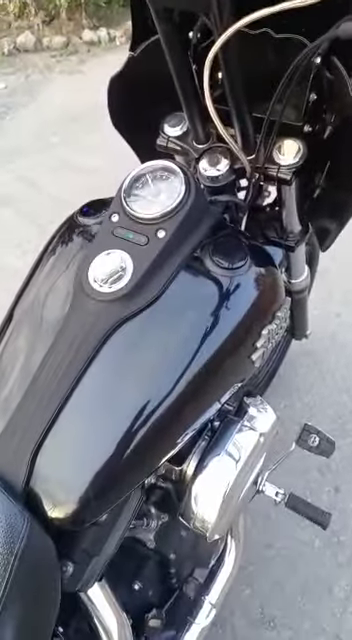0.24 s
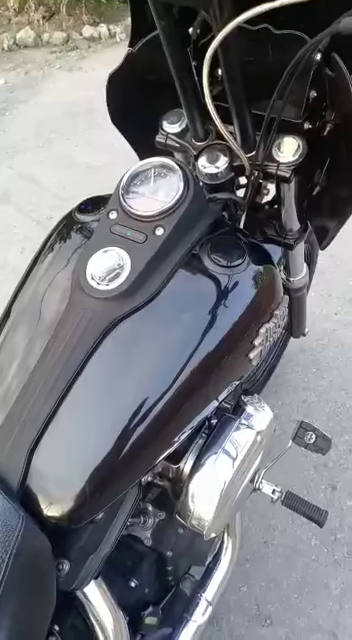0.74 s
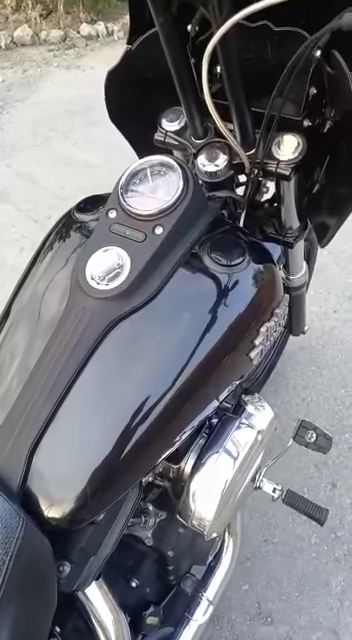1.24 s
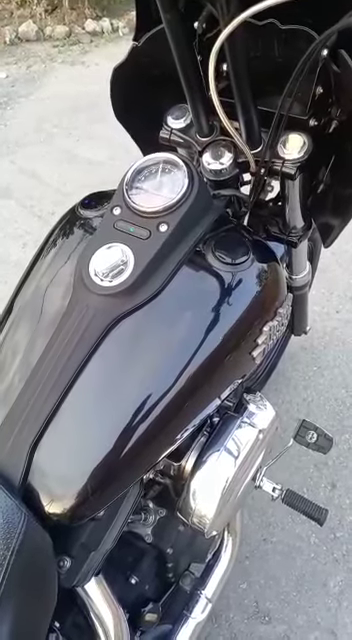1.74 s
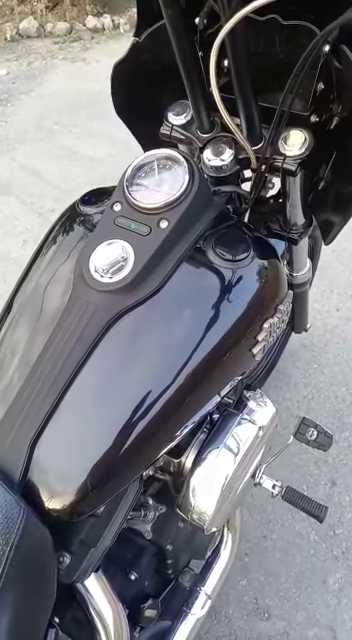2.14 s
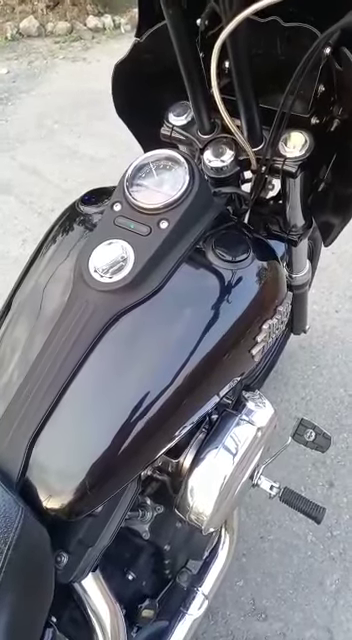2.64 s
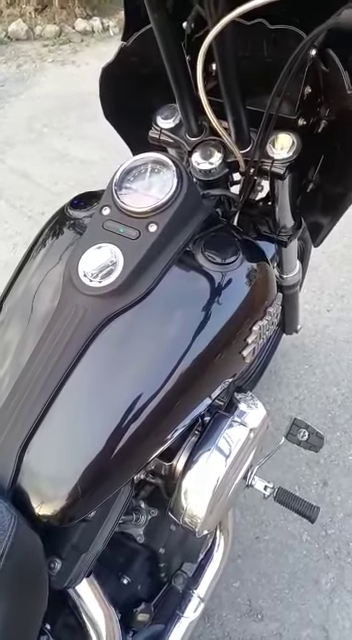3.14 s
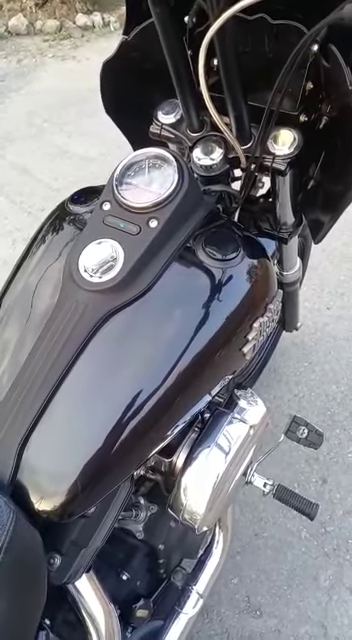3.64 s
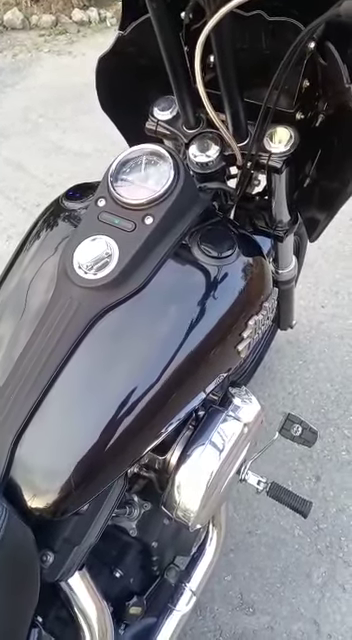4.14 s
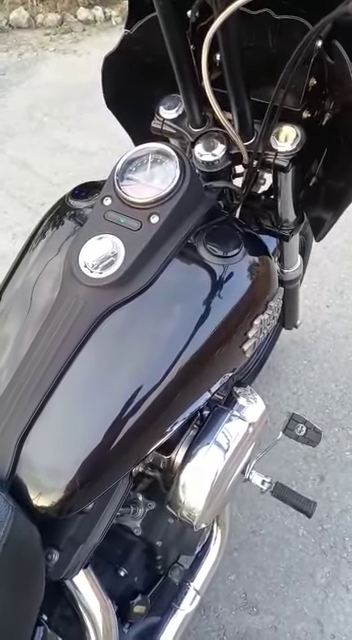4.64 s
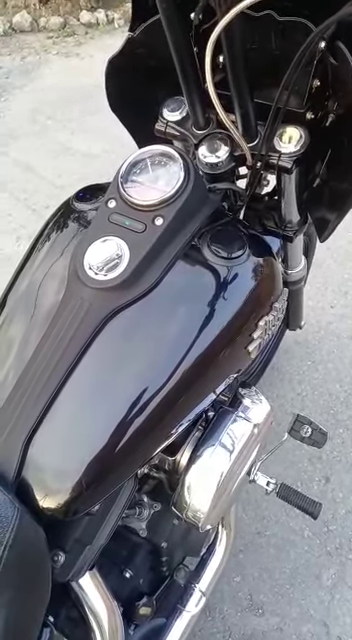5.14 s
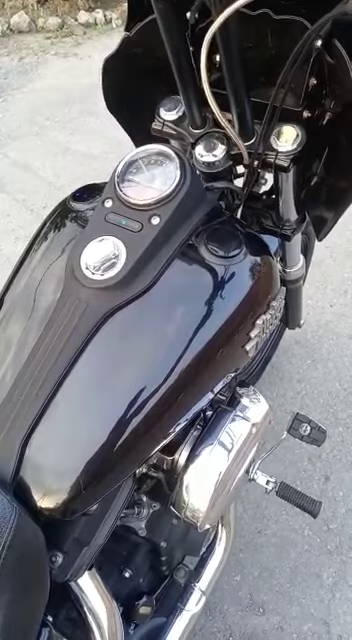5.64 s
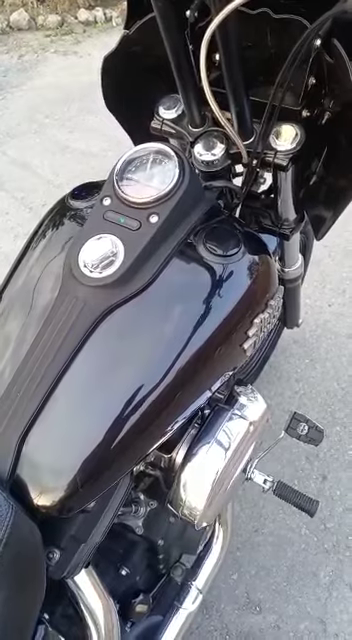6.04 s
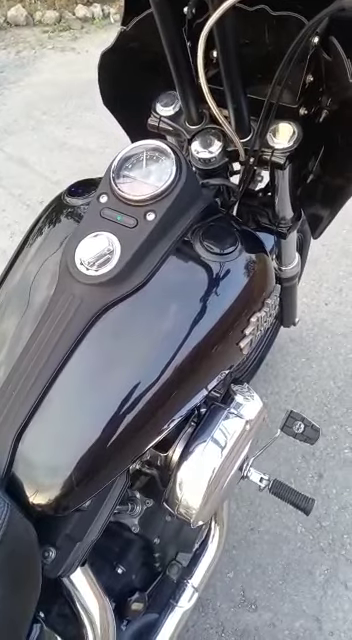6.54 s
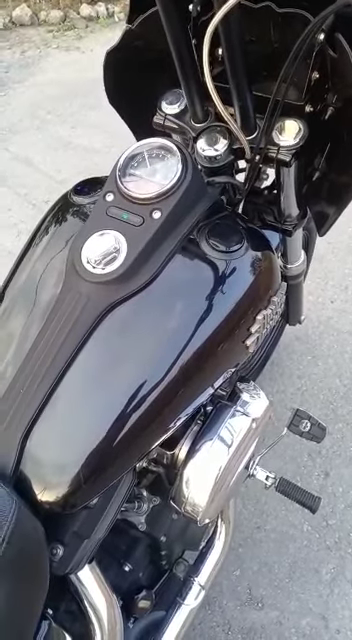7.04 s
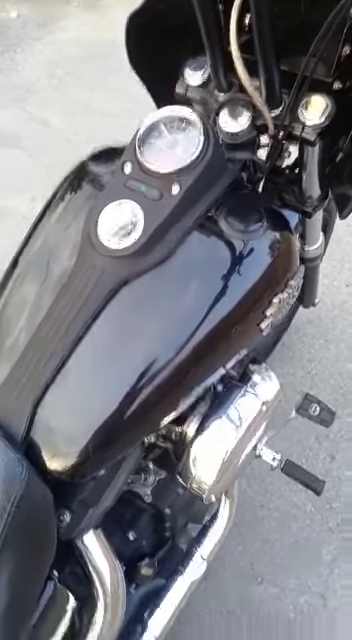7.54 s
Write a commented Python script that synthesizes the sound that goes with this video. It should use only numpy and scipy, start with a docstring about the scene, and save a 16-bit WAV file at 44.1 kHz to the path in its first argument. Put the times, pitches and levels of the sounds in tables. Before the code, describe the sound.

A V-twin motorcycle stands on a road with its engine running, heard close from above the tank. The throttle is blipped five times at uneven intervals. Each blip gives a quick intake bark with hiss and metallic knocking, then the revs fall away gradually. Deep, uneven exhaust thumps and mechanical clatter run throughout, and after the last blip the engine slows to idle.

```python
"""V-twin motorcycle, five throttle blips

Standing on a road, heard from above the tank; after the last blip the engine runs down to idle.
Two unevenly spaced cylinders thump through the exhaust. Valve gear, chain and cases clatter with
crank speed. With the throttle open the air box barks, the intake hisses and the pistons knock harder."""
import sys
import numpy as np
from scipy import signal
from scipy.fft import rfft, irfft, next_fast_len
from scipy.io import wavfile
from scipy.ndimage import uniform_filter1d, map_coordinates

SR = 44100
rng = np.random.default_rng(int(sys.argv[2]) if len(sys.argv) > 2 else 0)


def wrap_up_sound(samples):
    """Save the sound to the file named by the first command line argument, as 16-bit audio."""
    columns = np.atleast_2d(samples).T
    # keep every value between -1 and 1, then stretch to whole-number steps
    tamed = np.clip(columns, -1, 1)
    steps = np.round(tamed * 32767).astype(np.int16)
    wavfile.write(sys.argv[1], SR, steps)


N = 343098

# Grip twists: (pick-up [s], opens [s], fully open [s], eases [s], shut [s], top speed [rpm],
# run-down time constant [s], level offset [dB])
BLIPS = [(0.022, 0.026, 0.113, 0.21, 0.272, 3035, 1.426, 1.6),
         (0.936, 1.009, 1.103, 1.205, 1.295, 3686, 1.348, 0),
         (2.6, 2.666, 2.838, 2.96, 2.99, 3490, 1.318, 0.7),
         (3.722, 3.798, 3.882, 4.02, 4.06, 3704, 1.336, -0.5),
         (5.509, 5.553, 5.735, 5.83, 5.868, 3520, 1.356, 0)]
# Throttle shut; pipe booms near 3200 rpm: (speed [rpm], thump [dB], gas rush [dB], clatter [dB])
COAST_LEVELS = [(1120, -22, -40, -46.5), (1410, -24, -39.5, -45.5), (2060, -20, -36, -40.5),
                (2730, -16.5, -30.5, -36), (3223, -10.5, -32.5, -32.5), (3680, -11.5, -28.5, -31)]
# Last gulps of air at the closing throttle plate: (time [s], relative level [dB])
GULPS = [(0.259, -27), (1.275, -17), (2.973, -20), (4.043, -22), (5.856, -23.5)]
# Thin whistle: (time [s], level [dB])
WHISTLE_LEVELS = [(0, -55), (4.2, -62), (4.8, -53), (5.5, -72), (6.6, -52), (7.05, -54), (7.4, -90)]
# Resonances and gas flow: (frequency [Hz], gain [dB])
EXHAUST_PIPE = [(25, -31.5), (38, -25.5), (52, -14.5), (66, -5), (83, 2.5), (100, -4), (125, -9),
                (155, -11.5), (190, -22), (235, -22.5), (285, -20), (350, -36), (600, -42.5), (1500, -87)]
SILENCER_CHURN = [(35, -36), (55, -11.5), (72, -1), (85, 0.5), (100, 2.5), (135, -8), (190, -20.5),
                  (400, -66)]
GAS_RUSH = [(100, -22), (200, 2), (310, 6), (420, 2.5), (520, -5), (640, -3.5), (780, -6), (980, -6),
            (1200, -19.5), (2000, -41.5)]
CHAIN_COVER = [(400, -25), (560, -2), (620, 7), (700, 4), (820, 4.5), (1000, -10), (1600, -13)]
AIR_BOX = [(50, -47), (130, -11), (200, -5), (240, 2.5), (268, 6), (300, -1.5), (350, -17), (450, -46),
           (650, -31.5), (1100, -23.5), (2500, -82)]
THROTTLE_CHOKE = [(250, -40), (450, 11.5), (610, 19.5), (720, -15), (1000, -16), (1800, -33)]
# Body and flow spectra, with the recorder's notch near 7.5 kHz: (frequency [Hz], gain [dB])
ENGINE_CASES = [(500, -3), (1000, -4), (1300, -2.5), (1540, 0), (1850, -6.5), (2300, -0.5), (2800, 0.5),
                (3200, -8), (3650, -4.5), (4400, -9), (5500, -7), (6400, -6), (6900, -17), (7600, -39)]
AIR_HISS = [(5000, -22), (7500, -34), (8500, -7.5), (9800, 0.5), (12000, 3), (15700, 1)]
PISTON_KNOCK = [(300, -19), (950, -3), (1700, -3.5), (2450, 5), (3200, -8), (6300, -11.5), (7500, -33),
                (10000, -25), (15000, -22)]
# Fin and cover modes: (frequency [Hz], width [Hz], gain [dB])
FIN_MODES = [(1520, 130, 2), (2250, 110, 0), (2645, 50, -2), (3560, 70, -4), (4870, 50, -8), (5380, 60, -8),
             (6155, 65, -2)]
# Noise at the two microphones: (frequency [Hz], left-right correlation [0-1])
COHERENCE = [(290, 1), (640, 0.65), (1400, 0.14), (6000, 0.15)]
# Shading by the tank: (frequency [Hz], left minus right [dB])
TANK_SHADE = [(200, -.4), (500, -2), (770, -3), (1170, 4.5), (1790, 2), (2740, -4.5), (4190, 9.5),
              (6410, 9), (9810, 1.5), (12500, -4)]

START_RPM, IDLE_RPM = 1800, 1060
OVERRUN_S, HOLD_S = .0606, .1024  # from throttle shut to end of speed rise, to start of run-down
OPEN_THUMP_DB, OPEN_RUSH_BOOST_DB, OPEN_CLATTER_BOOST_DB = -14.5, 8, 1.5
ROAR_BOOST_DB, ROAR_FROM_RPM, ROAR_FULL_RPM = 3, 2750, 3240
CHAIN_DRIVE_DB, SLACK_DRIVE_DB, SLACK_BELOW_RPM = -51.5, -47.5, 1500
KNOCK_OVER_CLATTER_DB, PING_DB, PING_END_RPM, PING_FADE_RPM = 3.5, -22, 3310, 1000
LEFT_LAG_S, BAND_LIMIT_HZ = .00028, 15830


def amp(db):
    """Decibels to gain."""
    return 10 ** (np.asarray(db) / 20)


def unit_rms(x):
    """Scale the channel mean to rms 1."""
    return x / np.sqrt(np.mean(np.atleast_2d(x).mean(0) ** 2) + 1e-20)


def steady_rms(x, window=5000):
    """Scale to a running rms of 1; window in samples."""
    power = uniform_filter1d(uniform_filter1d(x ** 2, size=window), size=window)
    return x / np.sqrt(np.abs(power) + 1e-14)


def log_interp(points, hz):
    """Interpolate (frequency [Hz], value) on a log axis."""
    knots_hz, values = np.transpose(points)
    return np.interp(np.log(hz + 1), np.log(knots_hz + 1), values)


def filtered(x, response):
    """Apply a complex frequency response."""
    size = next_fast_len(N + SR // 2)
    return irfft(rfft(x, size) * response(np.fft.rfftfreq(size, 1 / SR)), size)[..., :N]


def ring(x, spectrum, size=16384):
    """Drive a minimum-phase filter with this spectrum."""
    cepstrum = irfft(np.log(amp(log_interp(spectrum, np.fft.rfftfreq(size, 1 / SR)))))
    cepstrum[1:size // 2] *= 2
    cepstrum[size // 2 + 1:] = 0
    impulse_response = irfft(np.exp(rfft(cepstrum)))
    return signal.fftconvolve(np.atleast_2d(x), impulse_response[None], axes=1)[:, :N]


def stereo_noise():
    """White noise, coherent in the bass, nearly unrelated in the treble."""
    def mid_side_gains(hz):
        angle = np.arccos(np.clip(log_interp(COHERENCE, hz), 0, 1)) / 2
        return np.array([np.cos(angle), np.sin(angle)])
    mid, side = filtered(rng.standard_normal((2, N)), mid_side_gains)
    return np.array([mid + side, mid - side])


def reflections(x, t60_s):
    """Convolve with a dense stereo tail of energy 1."""
    t = np.arange(SR // 2) / SR
    tail = rng.standard_normal((2, len(t))) * amp(-60 * t / t60_s)
    tail /= np.linalg.norm(tail, axis=1, keepdims=True)
    return signal.fftconvolve(x, tail, axes=1)[:, :N]


def wobble(rate_hz):
    """Smooth random curve with knots at this rate."""
    knots = rng.standard_normal(int(N * rate_hz / SR) + 4)
    return map_coordinates(knots, [np.arange(N) * rate_hz / SR])


def strokes(cycle, phase, spread_db, jitter_s=0):
    """One impulse per engine cycle at phase [cycles], random in size and timing."""
    at = np.searchsorted(cycle, np.arange(-1, cycle[-1] + 1) + phase)
    at = at[(at > 0) & (at < N)]
    size, shift = rng.standard_normal((len(at), 2)).T
    gains = amp(np.broadcast_to(spread_db, N)[at] * size)
    jittered = np.clip(at + shift * jitter_s * SR, 0, N - 1).astype(int)
    return np.bincount(jittered, gains, N)


def puffs(hits, rise_s):
    """Turn each impulse into a swell of the same height."""
    age = np.arange(SR // 8) / SR / rise_s
    return signal.fftconvolve(hits, age * np.exp(1 - age))[:N]


def revs():
    """Throttle [0-1], speed [rpm], level offset [dB]: twists pull the speed up, drag runs it down."""
    t = np.arange(N) / SR
    throttle, rpm, offset_db = 0, START_RPM, BLIPS[0][-1]
    for pickup_s, open_s, full_s, ease_s, shut_s, top_rpm, run_down_s, db in BLIPS:
        throttle = throttle + np.interp(t, [open_s, full_s, ease_s, shut_s], [0, 1, 1, 0])
        ramp = np.interp(t, [pickup_s, shut_s + OVERRUN_S], [0, 1])
        pull = ramp * ramp * (3 - 2 * ramp)
        coast_rpm = top_rpm * np.exp(-np.maximum(t - shut_s - HOLD_S, 0) / run_down_s)
        rpm = rpm + pull * (coast_rpm - rpm)
        offset_db = offset_db + pull * (db - offset_db)
    return throttle, np.maximum(rpm, IDLE_RPM), offset_db


def layer_levels(rpm, throttle, offset_db):
    """Thump, rush and clatter [dB] follow speed and load; the open intake roars more at speed."""
    speeds_rpm, *columns = np.transpose(COAST_LEVELS)
    thump_db, rush_db, clatter_db = [np.interp(rpm, speeds_rpm, db) + offset_db for db in columns]
    load = throttle ** .43
    roar_db = np.interp(rpm, [ROAR_FROM_RPM, ROAR_FULL_RPM], [0, ROAR_BOOST_DB])
    return (thump_db + load * (OPEN_THUMP_DB - thump_db),
            rush_db + load * (OPEN_RUSH_BOOST_DB + roar_db),
            clatter_db + load * OPEN_CLATTER_BOOST_DB)


def exhaust(cycle, rpm, thump_db):
    """Both cylinders blow into the pipe; slow strokes are softer and more uneven."""
    slow = np.clip((3000 - rpm) / 1600, 0, 1)
    spread_db = 1.6 + 1.6 * slow
    strong = strokes(cycle, -.045, spread_db, jitter_s=.0002)
    weak = (.56 + .13 * slow) * strokes(cycle, .55, spread_db, jitter_s=.0002)
    boom = -ring(strong + weak, EXHAUST_PIPE)
    soft = filtered(boom, lambda hz: 1 / (1 + (hz / 140) ** 4))
    thump = steady_rms((1 - slow) * boom + slow * soft)
    # gas churning in the silencer fills the gaps between slow strokes
    churn = (.15 + slow ** 2) * steady_rms(ring(rng.standard_normal(N), SILENCER_CHURN), window=1500)
    # the burn falters as the throttle shuts
    t = np.arange(N) / SR
    falter = sum(np.exp(-((t - shut_s - .01) / .019) ** 2) for _, _, _, _, shut_s, *_ in BLIPS)
    return amp(thump_db - 8.8 * falter + slow * wobble(10)) * steady_rms(thump + churn)


def gas_rush(cycle, rush_db):
    """Turbulent gas surges with each stroke."""
    hits = strokes(cycle, -.03, spread_db=2) + .7 * strokes(cycle, .5, spread_db=2)
    flow = .7 + puffs(hits, rise_s=.004)
    return amp(rush_db) * unit_rms(ring(stereo_noise() * flow, GAS_RUSH))


def chain_whine(cycle, rpm):
    """Tooth meshing slides through the cover's resonance; the large sprocket sounds only near idle."""
    def mesh(teeth):
        return amp(4 * wobble(14)) * np.sin(4 * np.pi * teeth * cycle + 1.5 * wobble(75))
    slack = np.interp(rpm, [IDLE_RPM, SLACK_BELOW_RPM], [1, 0])
    small = amp(CHAIN_DRIVE_DB) * mesh(teeth=19)
    large = amp(SLACK_DRIVE_DB) * slack * mesh(teeth=34)
    return ring(small + large, CHAIN_COVER)


def clatter(cycle, clatter_db):
    """Chain and gears rattle, tappets tick at set crank angles; cases and fins ring, leaking air hisses."""
    def fin_response(hz):
        return sum(amp(db) * 1j * hz * width_hz / (mode_hz ** 2 - hz ** 2 + 1j * hz * width_hz)
                   for mode_hz, width_hz, db in FIN_MODES)
    ticks = sum(strokes(cycle, phase, spread_db=3, jitter_s=.0005) for phase in (.1, .27, .5, .76))
    rattle = stereo_noise() * (1 + .41 * puffs(ticks, rise_s=.003))
    rattle = rattle + .5 * reflections(rattle, t60_s=.079)
    cases = amp(clatter_db + .09) * unit_rms(ring(rattle, ENGINE_CASES))
    taps = stereo_noise() * (.3 + puffs(ticks, rise_s=.0012))
    fins = amp(.7 * clatter_db - 21) * unit_rms(filtered(taps, fin_response))
    # air leaking past the shut throttle swells once a cycle
    suction = 1 + .25 * np.cos(2 * np.pi * (cycle - .08))
    hiss = amp(1.196 * clatter_db - 6.5) * unit_rms(ring(rattle * suction, AIR_HISS))
    return cases + fins + hiss


def whistle(centre_hz=6150, half_width_hz=55):
    """A thin band of noise that stands out on the later run-downs."""
    level_db = np.interp(np.arange(N) / SR, *np.transpose(WHISTLE_LEVELS))
    band = filtered(stereo_noise(), lambda hz: 1 / (1 + ((hz - centre_hz) / half_width_hz) ** 2))
    return amp(level_db) * unit_rms(band)


def piston_knock(cycle, rpm, throttle, clatter_db):
    """One metallic knock a cycle, much harder with open throttle at low speed."""
    lugging = throttle * np.clip((PING_END_RPM - rpm) / PING_FADE_RPM, 0, 1)
    force = amp(clatter_db + KNOCK_OVER_CLATTER_DB) + amp(PING_DB) * lugging
    hits = force * strokes(cycle, -.04, spread_db=1.4)
    return puffs(hits, rise_s=.0017) * unit_rms(ring(stereo_noise(), PISTON_KNOCK))


def intake(cycle, throttle):
    """Each intake stroke rings the air box, and rasps and hisses past the open throttle plate."""
    rear = throttle * strokes(cycle, .03, spread_db=.8, jitter_s=.0002)
    front = throttle * strokes(cycle, .49, spread_db=.8, jitter_s=.0002)
    box = -ring(rear + .98 * front, AIR_BOX)
    # the air column rings on behind the front cylinder's shut valve
    column = filtered(front, lambda hz: -1j * hz * 30 / (262 ** 2 - hz ** 2 + 1j * hz * 30))
    bark = amp(-22) * unit_rms(box + .32 * column)
    draught = stereo_noise() * puffs(rear + .8 * front, rise_s=.0018)
    rasp = amp(-33.5) * unit_rms(ring(draught, GAS_RUSH))
    hiss = amp(-51.5) * unit_rms(ring(draught, AIR_HISS))
    return bark + rasp + hiss


def throttle_gulps():
    """A last gulp of air chokes as the plate shuts."""
    hits = np.zeros(N)
    for time_s, db in GULPS:
        hits[int(time_s * SR)] = amp(db)
    choke = ring(hits, THROTTLE_CHOKE)
    return amp(5) * hits.max() * choke / np.abs(choke).max()


def microphone_response(hz):
    """The tank shades each side differently; pipe and air box are nearer the right microphone."""
    sides = [.5, -.5]
    shade = amp(np.outer(sides, log_interp(TANK_SHADE, hz)))
    lag = np.exp(-2j * np.pi * LEFT_LAG_S * np.outer(sides, hz))
    return lag * shade / np.sqrt(np.mean(shade ** 2, 0))


def scene():
    """Crank angle and throttle drive the engine, heard at two microphones."""
    throttle, rpm, offset_db = revs()
    cycle = -.145 + np.cumsum(rpm / 120) / SR  # two crank turns per cycle
    thump_db, rush_db, clatter_db = layer_levels(rpm, throttle, offset_db)
    bike = (exhaust(cycle, rpm, thump_db) + gas_rush(cycle, rush_db)
            + chain_whine(cycle, rpm) + clatter(cycle, clatter_db) + whistle()
            + piston_knock(cycle, rpm, throttle, clatter_db)
            + intake(cycle, throttle) + throttle_gulps())
    return filtered(bike, microphone_response)


def record(dry):
    """Soft-clip the highest peaks, then band-limit."""
    clipped = dry / (1 + np.abs(dry) ** 8) ** (1 / 8)
    return filtered(clipped, lambda hz: hz < BAND_LIMIT_HZ)


dry = scene()
out = record(dry)
wrap_up_sound(out)
```